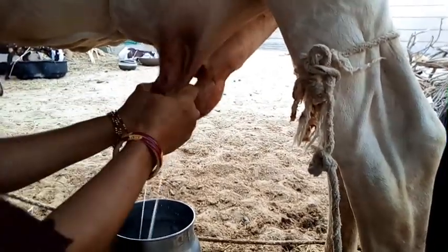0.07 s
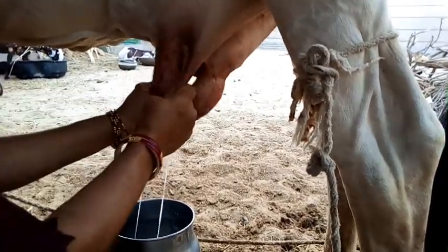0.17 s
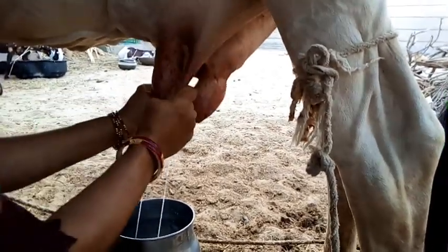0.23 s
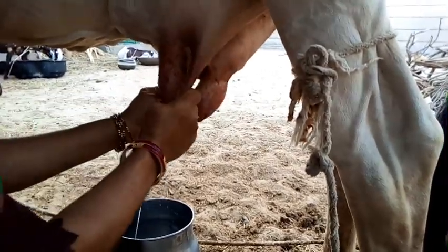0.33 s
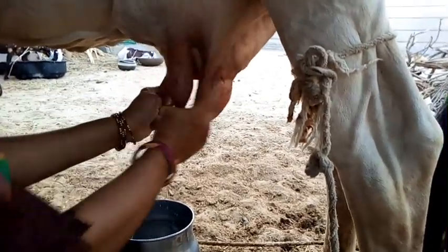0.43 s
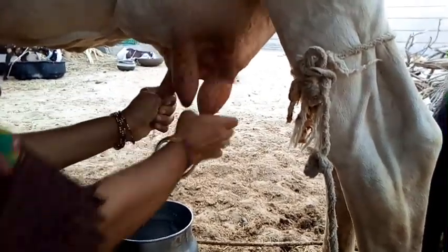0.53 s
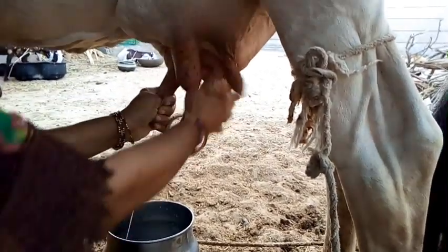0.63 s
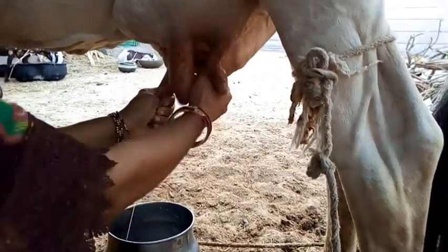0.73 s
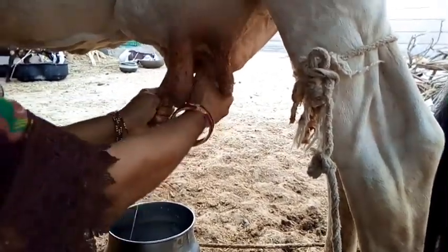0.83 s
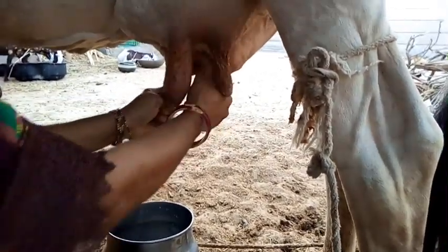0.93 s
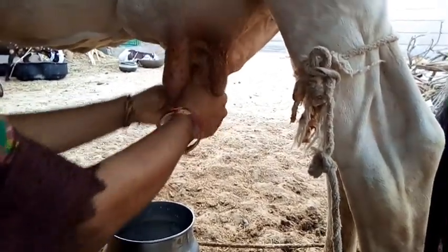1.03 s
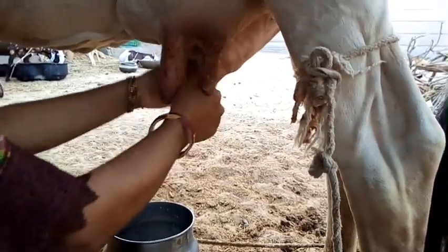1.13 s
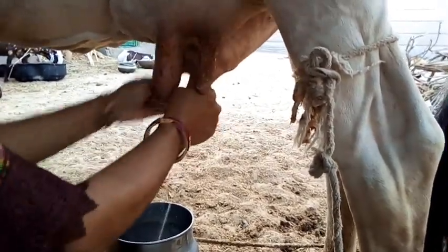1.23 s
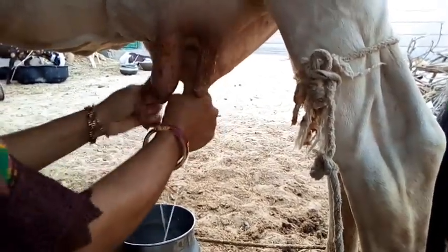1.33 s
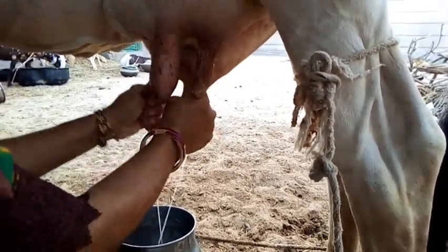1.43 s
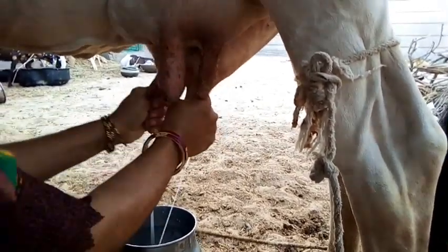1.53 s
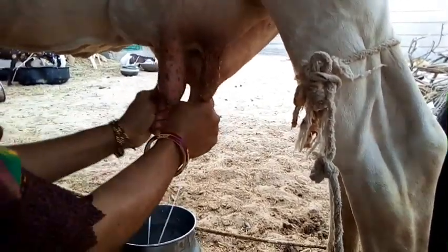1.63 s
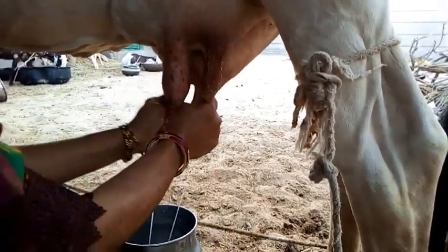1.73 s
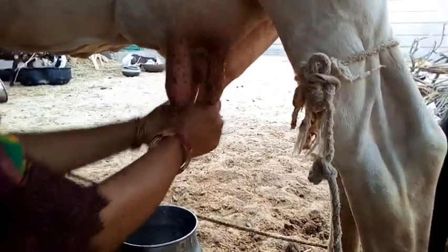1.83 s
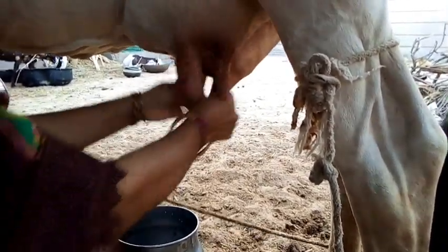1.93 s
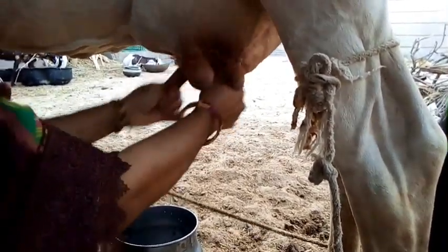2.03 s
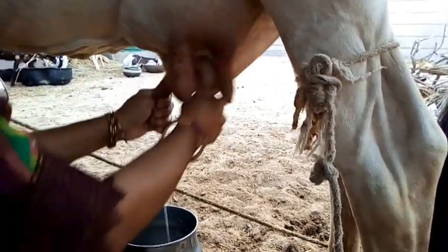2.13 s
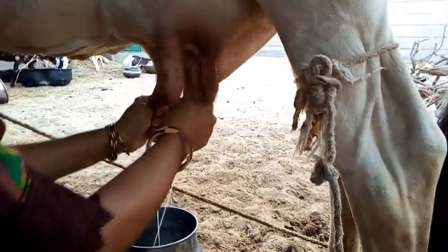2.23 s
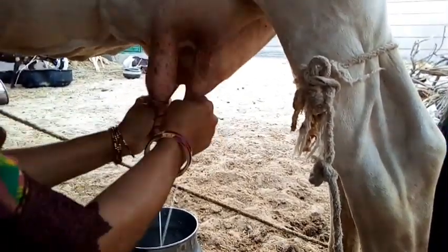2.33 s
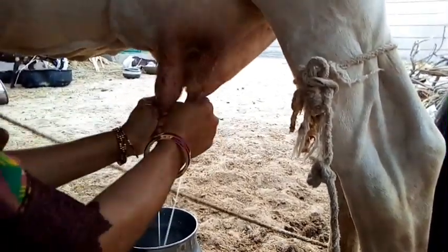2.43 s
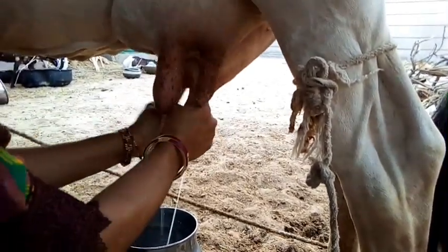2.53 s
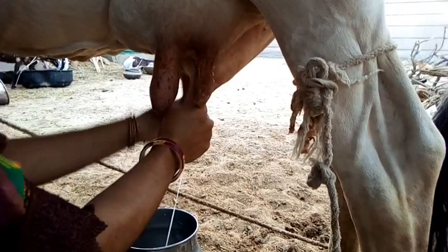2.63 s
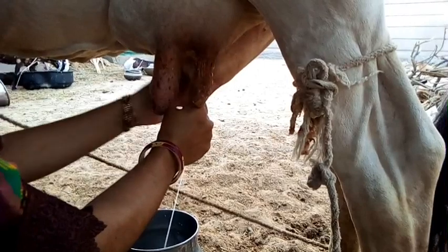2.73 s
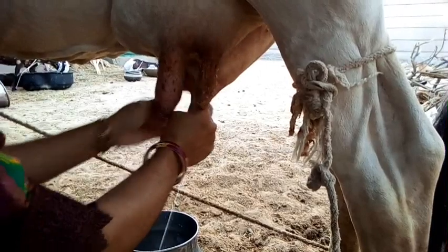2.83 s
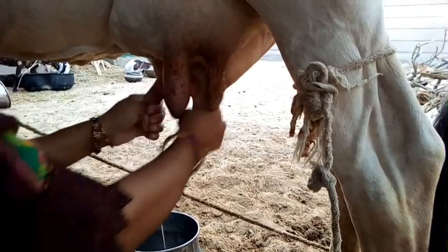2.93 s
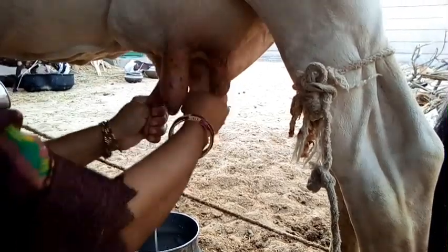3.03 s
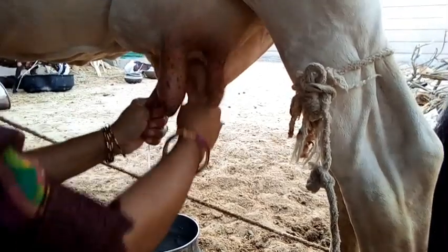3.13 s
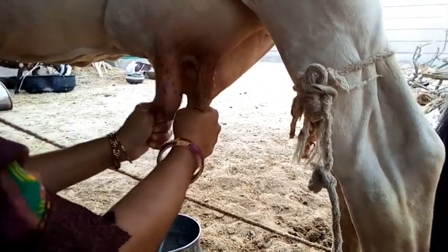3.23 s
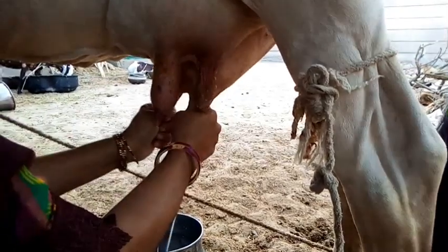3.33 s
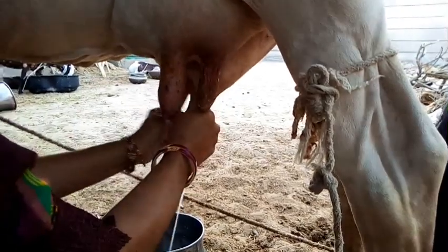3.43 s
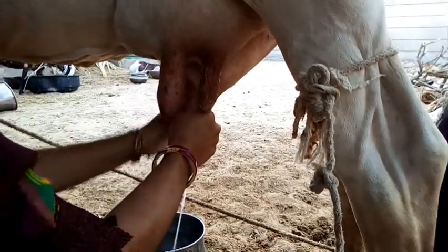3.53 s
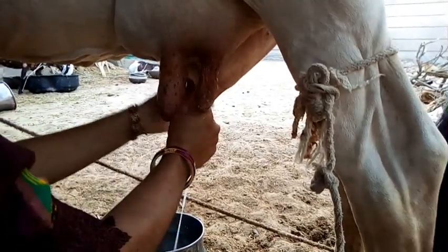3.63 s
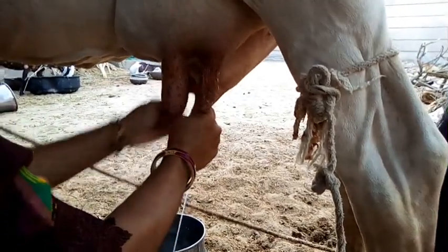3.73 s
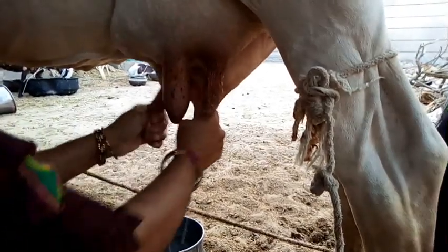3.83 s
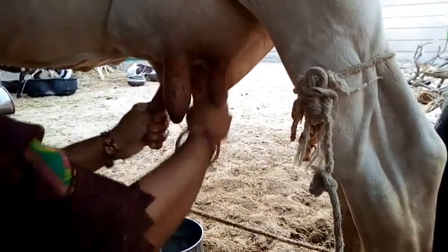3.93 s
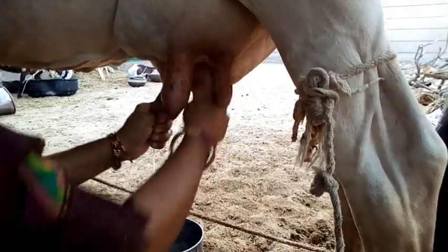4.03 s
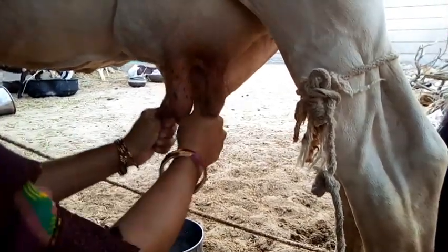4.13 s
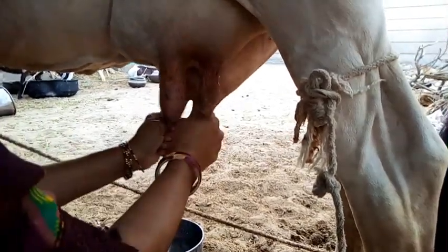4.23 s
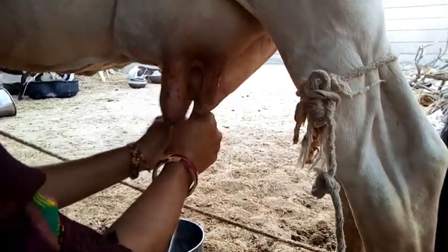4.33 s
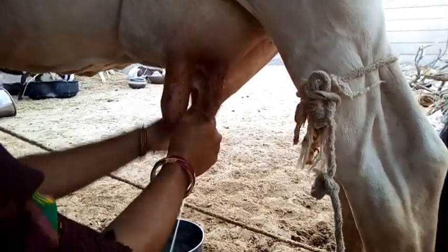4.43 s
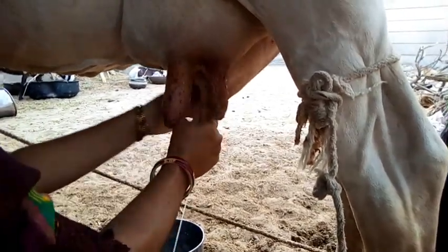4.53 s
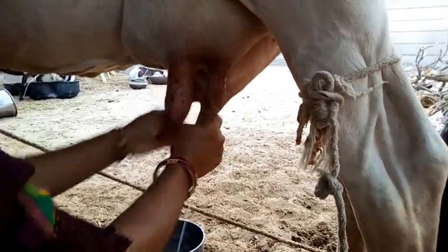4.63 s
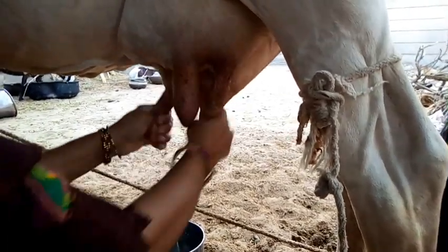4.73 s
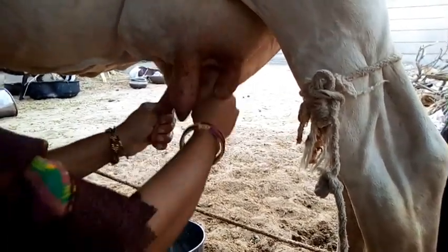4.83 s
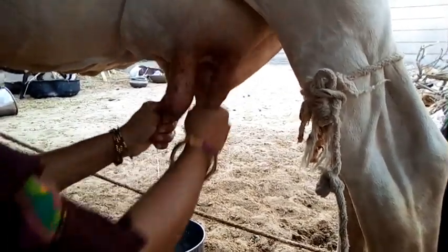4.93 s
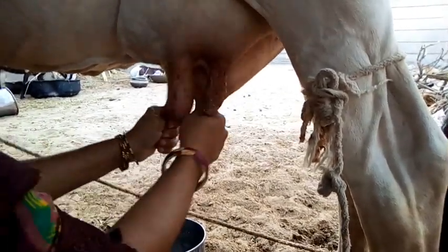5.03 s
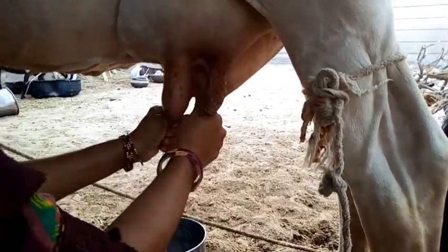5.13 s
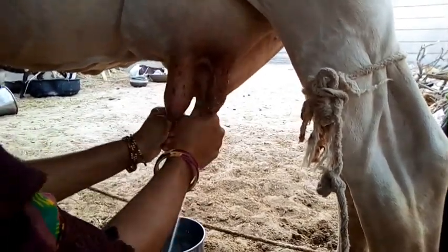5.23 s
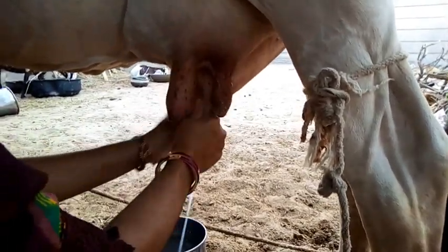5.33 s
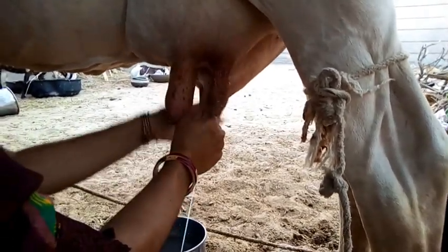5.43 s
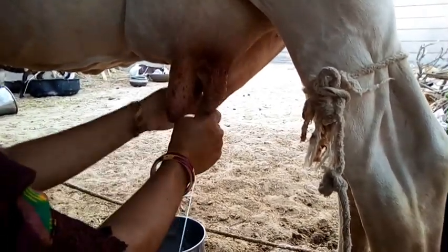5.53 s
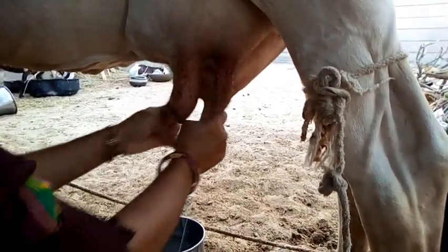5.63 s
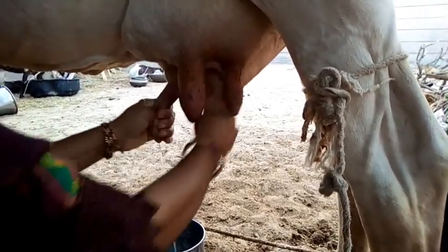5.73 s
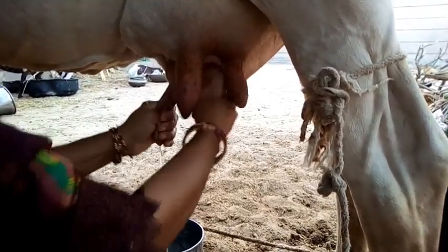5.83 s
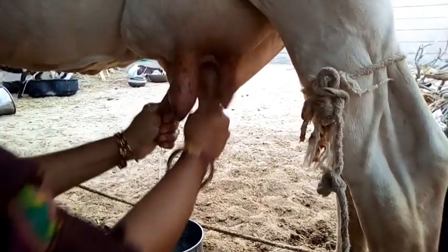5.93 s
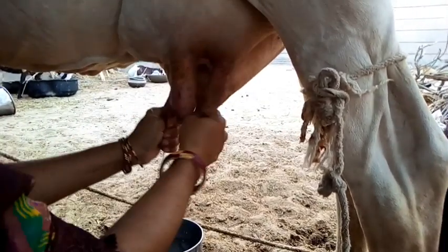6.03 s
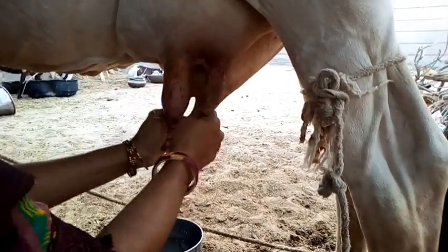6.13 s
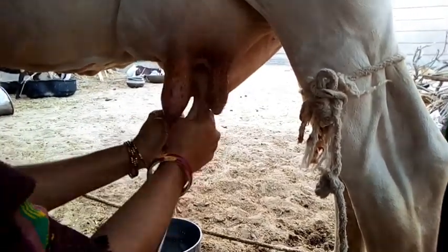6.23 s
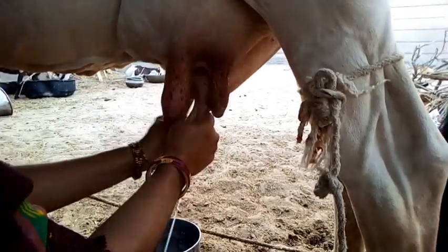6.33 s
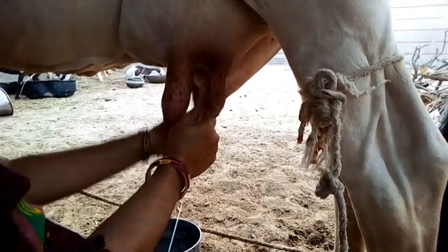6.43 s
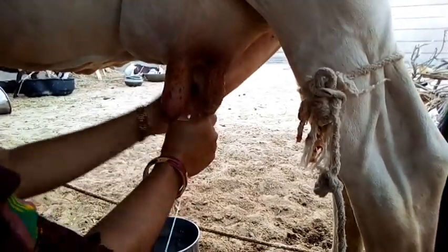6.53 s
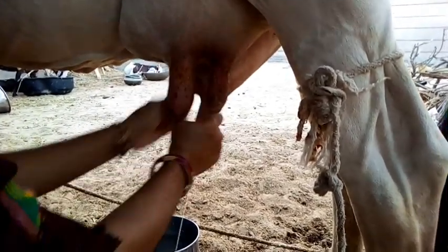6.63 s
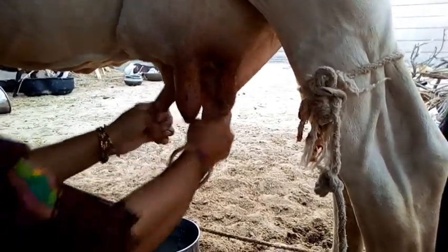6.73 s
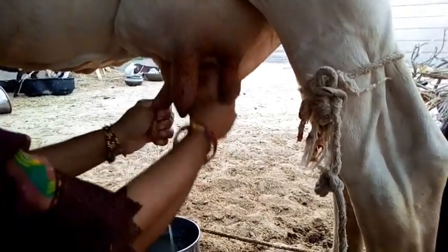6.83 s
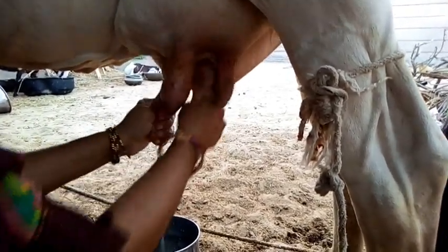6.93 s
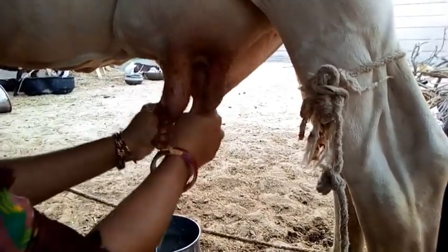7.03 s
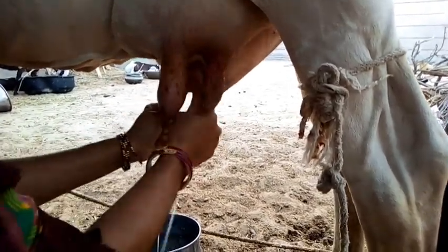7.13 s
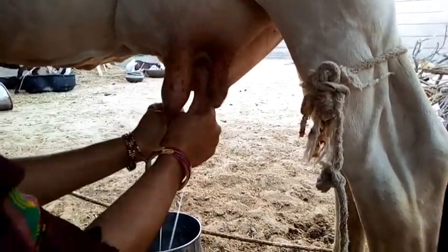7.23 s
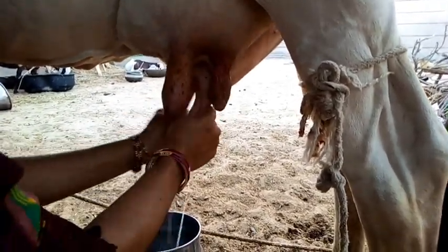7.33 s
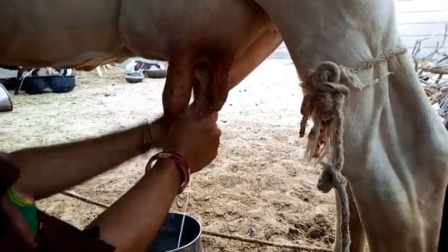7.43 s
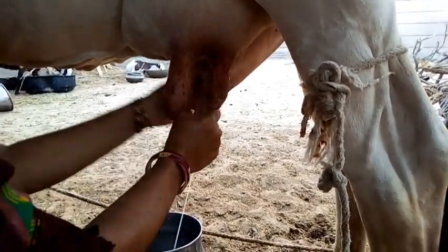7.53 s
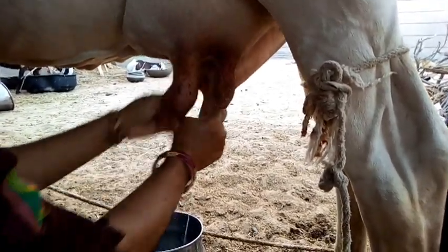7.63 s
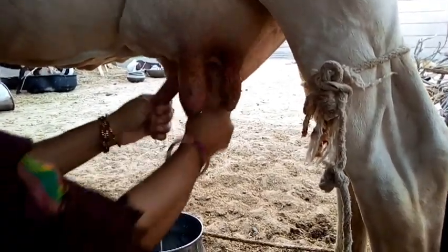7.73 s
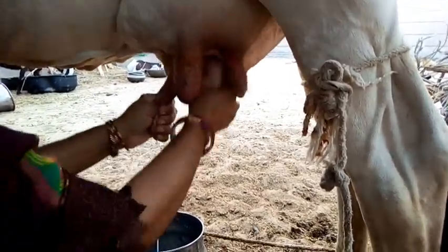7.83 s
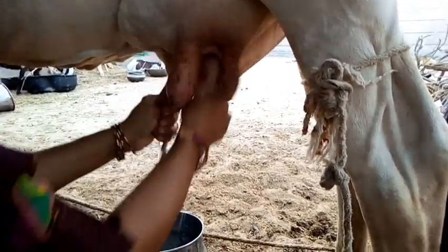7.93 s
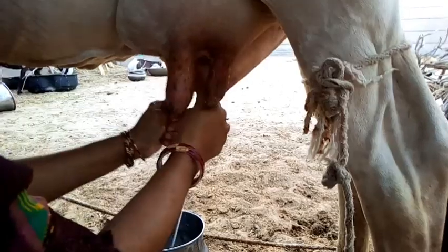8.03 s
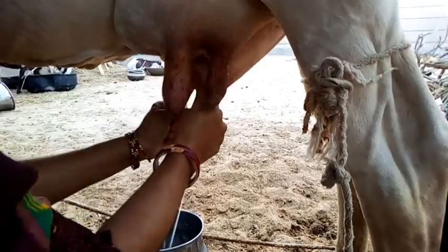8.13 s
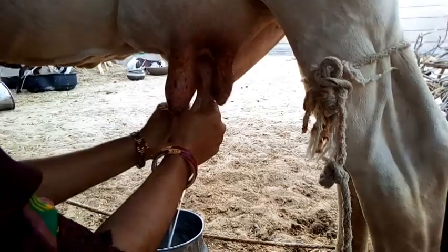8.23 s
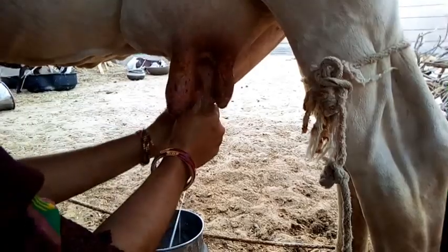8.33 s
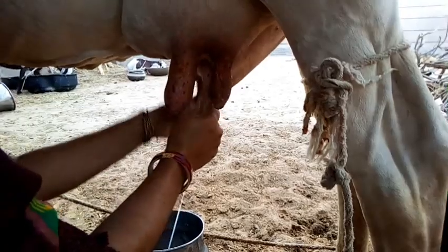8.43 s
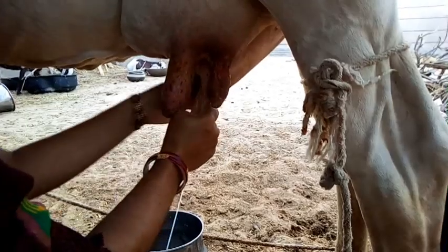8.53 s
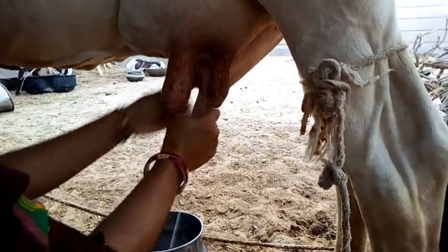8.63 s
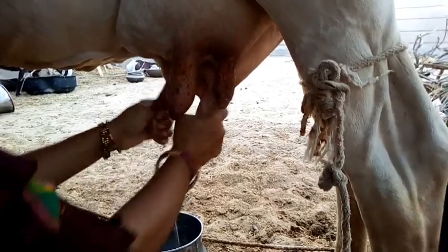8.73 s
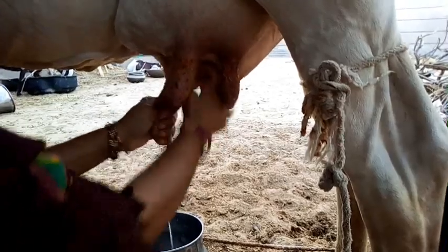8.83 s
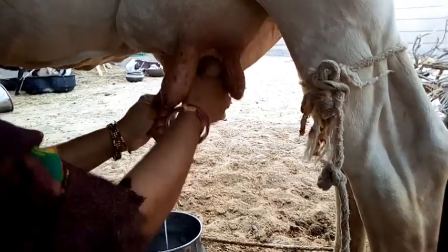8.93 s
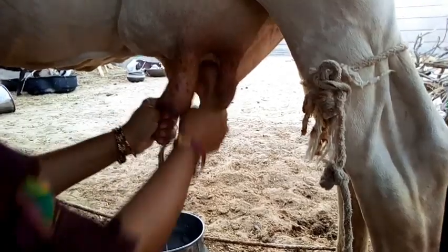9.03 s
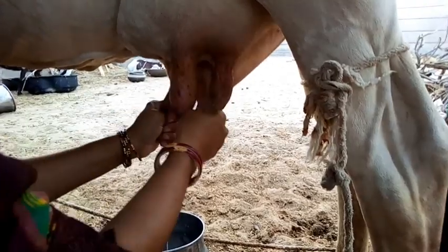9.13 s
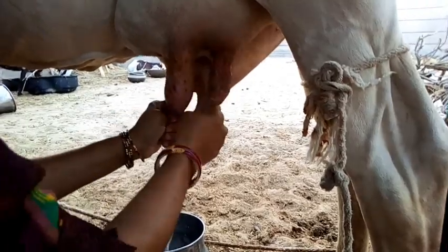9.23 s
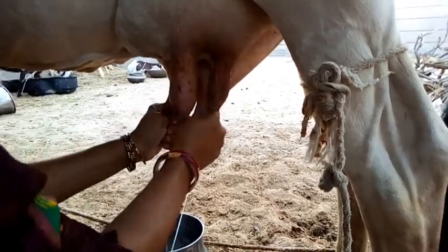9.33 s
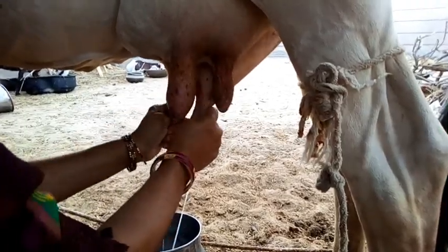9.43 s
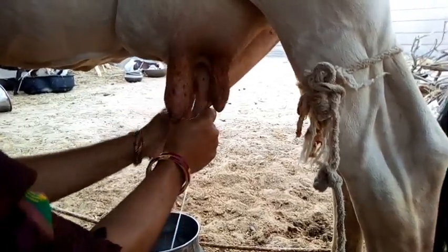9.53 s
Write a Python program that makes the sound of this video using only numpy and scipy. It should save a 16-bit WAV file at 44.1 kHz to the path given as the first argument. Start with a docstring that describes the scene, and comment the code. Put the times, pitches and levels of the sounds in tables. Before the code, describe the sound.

A cow is milked by hand in a quiet open yard, with one microphone near the pail. Streams of milk drum and hiss into the bucket in steady pulses, gurgling deeper as it fills, with sharp little drops smacking the metal. Thin bird whistles appear now and then, then a rapid chirping song around six seconds. Faint air hiss and a weak wavering motor hum remain behind.

```python
"""A cow is milked by hand into a metal pail: each jet is a stream of random drops that excites the hollow of
the pail, patters through the resonances of its wall and fizzes as filtered foam and spray.
Swelling tones gulp, small bubbles ring and fat drops smack as bursts of noise.
Gliding whistles make small birds chirp nearby, over the open yard's filtered hiss and two wavering tones
of a distant motor. One microphone, close by."""
import sys
import numpy as np
from scipy import signal
from scipy.fft import rfft, irfft, next_fast_len
from scipy.io import wavfile

SR = 44100
rng = np.random.default_rng(int(sys.argv[2]) if len(sys.argv) > 2 else 0)


def wrap_up_sound(samples):
    """Save the sound to the file named by the first command line argument, as 16-bit audio."""
    columns = np.atleast_2d(samples).T
    # keep every value between -1 and 1, then stretch to whole-number steps
    tamed = np.clip(columns, -1, 1)
    steps = np.round(tamed * 32767).astype(np.int16)
    wavfile.write(sys.argv[1], SR, steps)


N = 422478
TIME = np.arange(N) / SR
TOP_HZ = 15550  # upper edge of the sound


def undb(db):
    """Decibels to gain."""
    return 10 ** (np.asarray(db) / 20)


def unit(x):
    """Scale to rms 1."""
    return x / np.sqrt(np.mean(x ** 2) + 1e-20)


def gains(table):
    """The dB columns of a curve as gains at every sample."""
    s, *columns = np.transpose(table)
    return [undb(np.interp(TIME, s, column)) for column in columns]


def add(track, s, sound):
    """Mix a sound into a track at time s."""
    i = max(int(s * SR), 0)
    track[i:i + len(sound)] += sound[:max(N - i, 0)]


def walk(rate, size=N):
    """Smooth chance with a spread near 1: random knots, rate per second, joined by lines."""
    position = np.arange(size) * rate / SR
    count = int(position[-1]) + 2
    knots = rng.standard_normal(size)[:count]
    return 1.162 * np.interp(position, np.arange(count), knots)


def colour(x, points):
    """Filter by a spectrum of (Hz, dB) points, joined along log frequency."""
    hz, db = np.transpose(points)
    size = next_fast_len(N + 4096)
    f = np.maximum(np.fft.rfftfreq(size, 1 / SR), 1)
    gain = undb(np.interp(np.log(f), np.log(hz), db))
    return irfft(rfft(x, size) * gain, size)[:N]


def lowpass(x, hz):
    """Keep the lows without shifting them in time."""
    return signal.sosfiltfilt(signal.butter(2, hz, fs=SR, output="sos"), x)


def resonate(x, hz, width):
    """One resonance, gain 1 at its centre."""
    return signal.lfilter(*signal.iirpeak(hz, hz / width, SR), x)


def tail(t60):
    """Dense reflections that die away, with unit energy."""
    t = np.arange(SR // 2) / SR
    h = rng.standard_normal(len(t)) * undb(-60 * t / t60)
    return h / np.linalg.norm(h)


def echoes(x, t60, wet_db):
    """Direct sound plus the reflections of the yard."""
    return x + undb(wet_db) * signal.fftconvolve(x, tail(t60))[:N]


def drops(rate, scatter_db):
    """Random impacts of unequal size, rate per second."""
    hit = rng.random(N) < rate / SR
    sign = rng.choice([-1, 1], N)
    size = undb(scatter_db * np.clip(rng.standard_normal(N), -2, 2))
    return unit(hit * sign * size)


def bubbles(count, low_hz, high_hz, cycles, scatter_db):
    """Bubbles at random moments, each a short ring gliding upward."""
    out = np.zeros(N)
    for when, size, strength in rng.random((count, 3)):
        hz = low_hz * (high_hz / low_hz) ** size
        age = np.arange(int(cycles * SR / hz)) * hz / (cycles * SR)  # 0 to 1
        ring = np.exp(-5 * age) * np.sin(2 * np.pi * cycles * age * (1 + 0.065 * age))
        level = undb(scatter_db * strength ** 3) * (hz / low_hz) ** 0.54
        add(out, when * N / SR, level * ring)
    return unit(out)


# colour of the air in the yard: [f/Hz, relative level/dB]
YARD_COLOUR = [(25, -33), (45, -30), (75, -1), (130, 4.5), (250, -7), (400, 3), (520, -10), (850, -9),
               (1500, -9.5), (2500, -10.5), (4500, -4), (6200, -8.5), (7200, -22), (8200, -30),
               (13500, -31), (15000, -15)]
YARD_DB = -57.8
# distant motor, before a final trim: [t/s, level of the low line/dB, level of the upper line/dB]
MOTOR_LEVELS = [(0, -54, -51), (.6, -72, -59.5), (1.9, -82, -68), (2.5, -68, -56), (4.2, -66, -67.5),
                (5.3, -71, -54), (6.4, -73, -65.5), (7.2, -58, -59), (8, -63, -58), (9, -52.5, -65),
                (9.58, -71, -68)]
# the two lines of the motor: [f/Hz of the low line, f/Hz of the upper line]
MOTOR_HZ = (68.7, 95.2)


def yard():
    """Soft outdoor hiss and the wavering hum of a distant motor."""
    air = unit(colour(rng.standard_normal(N), YARD_COLOUR))
    air = air * undb(YARD_DB + 1.5 * walk(1.44))
    hum = 0
    for hz, gain in zip(MOTOR_HZ, gains(MOTOR_LEVELS)):
        wavering_hz = hz * (1 + 0.037 * walk(18))
        hum = hum + gain * np.sin(2 * np.pi * np.cumsum(wavering_hz) / SR)
    return air + undb(-0.5) * hum


# one row per pull of a teat, the two weak ones a dribble; levels drive the layers before their own trims:
# [t/s of the start, tightening/s, draining/s, plunge level/dB, splash level/dB, spray level/dB,
#  pressure lacking at the start/dB, pressure lacking at the end/dB, level of the wall/dB,
#  tilt of the boom/dB per octave, brightness of the foam/dB]
SQUIRTS = [(.03, 0.055, 0.13, -35, -39.5, -49, 1.5, 8, -9.5, 2, -12),
           (.27, 0.096, .2, -46.5, -61, -74, 3, -3.5, -13, -8, -0.5),
           (.696, .02, 0.058, -52, -67.5, -82, 0, -3.5, 3, 10, 8),
           (1.172, 0.37, .13, -37, -45, -56.5, 3, 2.5, -6, 9, -9),
           (2.122, 0.33, 0.34, -37.5, -41, -49.5, 7.5, 8.5, -3.5, -1.5, -3.5),
           (2.916, 0.55, 0.28, -37, -42, -48, 7.5, 11, 0.5, 6, -6),
           (3.858, 0.49, .22, -35.5, -45.5, -49, 4.5, 9, 1.5, 4.5, 1),
           (4.711, .53, 0.36, -34, -40.5, -45, 12, 20, -2, 4.5, -0.5),
           (5.764, 0.42, 0.36, -36.5, -44.5, -51.5, 3.5, 13, 2.5, 5, 2.5),
           (6.789, 0.43, 0.31, -35.5, -43, -50, 6.5, 15, 1, -6.5, -2.5),
           (7.727, 0.33, 0.56, -37.5, -43.5, -45.5, 12.5, 16.5, 1, -11.5, -2.5),
           (8.71, .7, 0.15, -37.5, -46.5, -50.5, 10, 5.5, 0, -1.5, -4.5)]


def squeezes(peaks_db, law):
    """Each jet sets in fast, changes pressure as the fist tightens and the teat drains, then is cut off."""
    follow, onset_db_s, release_db_s = law
    power = 0
    for (start, tighten, drain, _, _, _, start_db, end_db, *_), peak_db in zip(SQUIRTS, peaks_db):
        end = start + tighten + drain
        slack_db = np.interp(TIME, [start, start + tighten, end], [start_db, 0, end_db])
        before_db = onset_db_s * np.maximum(start - TIME, 0)
        after_db = release_db_s * np.maximum(TIME - end, 0)
        level_db = peak_db - follow * slack_db - before_db - after_db
        power = power + undb(np.maximum(level_db, -120)) ** 2
    return np.sqrt(power)


# how each layer follows the squeeze: (dB per dB of pressure, onset dB per s, release dB per s)
PLUNGE_LAW, SPLASH_LAW, SPRAY_LAW = (0.39, 210, 190), (0.95, 104, 130), (1.33, 87, 95)
FLUTTER_HZ, FLUTTER_DB = 21.83, 1.26  # the jet is never quite even


def jet():
    """Strength of plunge, splash and spray, and the colour given by where each squirt lands."""
    start, tighten, _, plunge_db, splash_db, spray_db, _, _, *aim = np.transpose(SQUIRTS)
    flutter = undb(FLUTTER_DB * walk(FLUTTER_HZ))
    layers = [(plunge_db, PLUNGE_LAW), (splash_db, SPLASH_LAW), (spray_db, SPRAY_LAW)]
    strengths = [flutter * squeezes(db, law) for db, law in layers]
    return strengths + gains(np.transpose([start + tighten, *aim]))


# resonances of the hollow of the pail: [f/Hz, width/Hz, relative level/dB]
HOLLOW = [(189, 25, 0), (215.4, 14.7, 6.5), (250.3, 25, 4.5), (281, 20, -5), (326.5, 11.8, 2.5),
          (353, 4.1, -14), (399.4, 19.5, -8.5)]


def plunge(force, tilt):
    """Drops punch into the milk; the air in the pail booms with them."""
    push = drops(rate=330, scatter_db=1.5) * force
    boom = 0
    for hz, width, db in HOLLOW:
        gain = undb(db) * tilt ** np.log2(hz / 250)
        boom = boom + gain * resonate(push, hz, width)
    boom = colour(boom, [(20, 10), (45, -5), (100, -2.5), (170, 1.5), (410, 1.0), (520, -9.0), (1200, -14.0)])
    return unit(boom) * np.sqrt(np.mean(force ** 2)) * undb(-2.0)


def gurgle(force):
    """Pea-sized bubbles ring in the churned milk as long as the jet plunges."""
    return undb(-18.5) * force * bubbles(count=450, low_hz=453, high_hz=927, cycles=58, scatter_db=2.5)


# resonances of the wall of the pail: [f/Hz, width/Hz, relative level/dB, change as the milk rises/dB per s]
WALL = [(698, 73, 1.5, -0.27), (1056, 83, -1, 0.08), (1261, 41, -2.5, 0.51), (1313, 61, -3.5, 0.6),
        (1730, 150, -1, -0.16), (2355, 130, 3, -0.83), (3040, 240, -10, 0.12), (3760, 130, -5.5, -0.4),
        (4806, 177, 1.5, 0), (5500, 280, -32, -4), (6630, 150, -9, 0.5), (8530, 110, -10, 0),
        (9350, 130, -16, 0)]
# colour of the foam: [f/Hz, relative level/dB]
FOAM_COLOUR = [(200, -5.5), (450, -10.5), (700, -3.5), (1100, -5), (1500, -3.5), (2300, -1.5), (2800, -2),
               (3800, -0.5), (4400, -5.5), (5600, 0.5), (6500, 1.5), (7300, -38), (9000, -41), (15000, -44)]
# colour of the spray: [f/Hz, relative level/dB]
SPRAY_COLOUR = [(1500, -16), (4000, 5), (5500, 2), (7200, -1), (8000, -6.5), (8700, -5), (9300, -6),
                (11500, -5.5), (13000, -9.5), (14000, -21), (14700, 6.5), (15500, 1)]
WANDER_HZ, WANDER_DB = 5, 2.5  # the landing point wanders and wakes other modes of the wall


def splash(splash_gain, spray_gain, wall_gain, bright):
    """The wobbling jet patters on foam and wall and throws off a fine spray."""
    wobble = undb(1.37 * walk(70))
    knocks = drops(rate=2400, scatter_db=6.5) * wobble
    wall = 0
    for hz, width, db, drift in WALL:
        mode_gain = undb(db + drift * TIME + WANDER_DB * walk(WANDER_HZ))
        wall = wall + mode_gain * resonate(knocks, hz, width)
    wall = unit(wall)
    fizz = bubbles(count=4000, low_hz=792, high_hz=6020, cycles=20.6, scatter_db=6)
    foam = drops(rate=1600, scatter_db=3.5) * wobble + undb(-10.0) * fizz
    foam = unit(colour(foam, FOAM_COLOUR))
    dull = lowpass(foam, 3000)
    foam = dull + bright * (foam - dull)  # thick foam swallows the treble
    spray = unit(colour(drops(rate=1400, scatter_db=3.0) * wobble, SPRAY_COLOUR))
    return splash_gain * (undb(1.5) * foam + wall_gain * wall) + spray_gain * undb(6) * spray


# the jet spits for a moment, throwing off extra spray: [t/s, length/s, level/dB before the trim of the spray]
SPITS = [(.06, .04, -55), (0.188, 0.054, -50), (1.09, 0.04, -53), (1.471, 0.07, -48), (1.595, 0.047, -49.5),
         (2.018, 0.039, -67), (2.105, 0.036, -59), (3.085, 0.03, -51), (3.87, 0.043, -52),
         (4.888, .04, -48), (5.204, .055, -44), (6.53, 0.05, -56), (7.543, 0.02, -51.5)]


def spits():
    """Short swells in the strength of the spray, each a rounded arch."""
    strength = 0
    for s, length, db in SPITS:
        across = 2 * (TIME - s) / length - 1  # -1 to 1 within the spit
        strength = strength + undb(db) * np.sqrt(np.maximum(1 - across ** 2, 0))
    return strength


# the fattest drops that smack the pail: [t/s, level/dB before a final trim, centre f/Hz]
SMACKS = [(0.085, -22.5, 1510), (0.423, -35.5, 3900), (0.695, -45, 700), (1.51, -32, 1990),
          (1.606, -28, 2240), (2.236, -29, 2000), (2.456, -20.5, 2820), (2.473, -21, 1910),
          (3.31, -22, 2190), (3.393, -25, 1340), (4.415, -27, 4870), (4.894, -27, 4860), (5.142, -25, 1820),
          (5.234, -23, 2000), (5.314, -22, 2600), (7.215, -20.5, 1900), (7.633, -31.5, 4820),
          (7.728, -28.5, 2260), (7.742, -32, 8500), (8.008, -24, 1900), (8.107, -33, 4810),
          (8.757, -31, 1380), (9.096, -27, 900)]


def smacks():
    """A fat drop bursts on the wall in a brief crackle of band-limited noise."""
    out, t = np.zeros(N), np.arange(SR // 20) / SR
    for s, db, hz in SMACKS:
        burst = rng.standard_normal(len(t)) * np.exp(-t / 0.0054)
        band = [hz / 2.1, min(hz * 1.5, TOP_HZ)]
        burst = signal.sosfilt(signal.butter(2, band, "bandpass", fs=SR, output="sos"), burst)
        loudness = np.std(burst[:SR // 250])  # over the first 4 ms
        add(out, s, undb(db - 13.0) * burst / loudness)
    return out


def pail(x, t60, wet_db, count=12):
    """Short waves bounce around inside the pail, by other paths as the landing point wanders."""
    low = lowpass(x, 2200)
    high = x - low
    paths = np.array([signal.oaconvolve(high, tail(t60)[:SR // 10])[:N] for _ in range(count)])
    share = np.array([walk(7) for _ in range(count)])
    wet = np.sum(paths * share, axis=0) / np.linalg.norm(share, axis=0)
    return low + (high + undb(wet_db) * wet) / np.hypot(1, undb(wet_db))


# the biggest gulps of air dragged under by the jet: [t/s, level/dB before a final trim, starting f/Hz]
BIG_GULPS = [(1.142, -32.5, 336), (1.266, -25.5, 323), (1.498, -32, 277), (1.665, -23.5, 251),
             (2.23, -27, 402), (2.31, -19.5, 272), (2.941, -24.5, 328), (3.058, -30, 308),
             (3.391, -26, 246), (3.442, -23, 241), (3.663, -21, 247), (3.957, -20, 255), (4.146, -21, 216),
             (4.32, -23, 248), (4.429, -32, 212), (4.742, -23.5, 340), (4.881, -18.5, 230),
             (4.959, -20, 206), (5.479, -24.5, 218), (6.269, -19.5, 200), (7.098, -24, 329),
             (7.229, -16.5, 182), (7.76, -22, 256), (8.012, -24, 333), (8.047, -20, 210),
             (8.374, -22.5, 192), (8.943, -20, 206), (9.154, -23.5, 320)]
# small gulps come by chance, as loud as the plunge allows, and deepen as the pail fills
GULPS_PER_S, GULP_HZ, GULP_SPREAD_OCTAVES, GULP_OVER_PLUNGE_DB = 7, 279.6, .18, 6.5
GULP_SINK_OCTAVES_PER_S = 0.059


def gulps(force):
    """A pocket of air swells, rings for a few cycles and rises in pitch: a few big ones, many small."""
    out, t = np.zeros(N), np.arange(SR // 10) / SR
    age = t / 0.0083
    swell = age * np.exp(1 - age)
    big = [(s, undb(db), hz) for s, db, hz in BIG_GULPS]
    moments = np.flatnonzero(rng.random(N) < GULPS_PER_S / SR)
    octaves = GULP_SPREAD_OCTAVES * rng.standard_normal(N) - GULP_SINK_OCTAVES_PER_S * TIME
    pitch = GULP_HZ * 2 ** octaves
    small = [(i / SR, force[i] * undb(GULP_OVER_PLUNGE_DB), pitch[i]) for i in moments]
    for s, size, hz in big + small:
        ring = np.sin(2 * np.pi * hz * t * (1 + 0.66 * t))
        add(out, s - .003, size * undb(-8.5) * swell * ring)  # sets in 3 ms ahead
    return out


SONG_SCATTER_DB, SONG_SCATTER_OCTAVES = 0.7, 0.0091  # no two notes are sung alike


def phrase(motif, start, period, count):
    """The notes of a motif sung several times at an even pace, each a little different."""
    notes = []
    for k in range(count):
        for s, length, start_hz, end_hz, db, rasp in motif:
            pitch, effort = rng.standard_normal(2)
            shift = 2 ** (SONG_SCATTER_OCTAVES * pitch)
            level_db = db + SONG_SCATTER_DB * effort
            notes.append((start + k * period + s, length, start_hz * shift, end_hz * shift, level_db, rasp))
    return notes


# lone bird calls: [t/s, length/s, start f/Hz, end f/Hz, level/dB before rasp and echo, rasp 0-1]
CHIRPS = [(.83, .03, 2700, 2870, -58, 0.16), (.87, .025, 3000, 2780, -55, 0.3),
          (0.948, 0.036, 2320, 2340, -57, 0.06), (1.004, 0.02, 2310, 2330, -54, 0.05),
          (0.973, .024, 3360, 3060, -48.5, 0.13), (1.026, .06, 5360, 4870, -49.5, .15),
          (1.078, .12, 5050, 5870, -45.5, 0.19), (1.994, 0.02, 5930, 5450, -50.5, 0.3),
          (2.177, 0.12, 5110, 5940, -46, 0.37), (2.712, 0.14, 4060, 2970, -49.5, 0.25),
          (5.511, 0.046, 6240, 5310, -39.5, 0.9), (5.565, 0.066, 5880, 5800, -46.5, .63),
          (6.743, .053, 6700, 8100, -54, .9), (7.046, 0.017, 4940, 6200, -34, 0.4),
          (7.054, 0.019, 6400, 5850, -26, 0.48), (7.295, 0.18, 4900, 5890, -50, .1),
          (8.472, .062, 5060, 4210, -40.5, 0.02)]
# a song of two phrases, each a repeated motif; columns as for the calls, with t/s counted into the motif
OPENING_MOTIF = [(0, .072, 6680, 6580, -44, 0.73), (.083, .055, 4500, 4350, -47.5, 0.54)]
# the second phrase: [t/s into the motif, length/s, start f/Hz, end f/Hz, level/dB, rasp 0-1]
TRILL_MOTIF = [(0, 0.0827, 4115, 4443, -38, 0.23), (.07, .04, 7300, 8100, -52, .65),
               (.104, 0.0547, 5740, 5390, -39.5, 0.31)]
OPENING_S, OPENING_PERIOD_S = 5.352, .138
TRILL_S, TRILL_PERIOD_S = 5.83, .169
ARCH_HZ = 109.3  # each note bows upward in its middle


def birds():
    """Gliding whistles, some made raspy by a fast flutter of pitch and strength; the yard echoes them."""
    out, size = np.zeros(N), SR // 4
    opening = phrase(OPENING_MOTIF, OPENING_S, OPENING_PERIOD_S, count=4)
    trill = phrase(TRILL_MOTIF, TRILL_S, TRILL_PERIOD_S, count=5)
    for s, length, start_hz, end_hz, db, rasp in CHIRPS + opening + trill:
        age = np.minimum(np.arange(size) / (length * SR), 1)
        arch = np.sin(np.pi * age)
        glide_hz = start_hz + (end_hz - start_hz) * age + ARCH_HZ * arch
        hz = glide_hz + rasp * 520 * walk(1100, size=size)
        swell = np.abs(arch) ** .5 * undb(rasp * 5.9 * walk(352, size=size))
        add(out, s, undb(db) * swell * np.sin(2 * np.pi * np.cumsum(hz) / SR))
    return echoes(out, t60=0.35, wet_db=-1.5)


def scene():
    """Milk in the pail, birds and yard, the same in both channels."""
    plunge_gain, splash_gain, spray_gain, wall_gain, tilt, bright = jet()
    all_spray = np.hypot(spray_gain, spits())
    patter = splash(splash_gain, all_spray, wall_gain, bright) + smacks()
    milk = plunge(plunge_gain, tilt) + gurgle(plunge_gain) + gulps(plunge_gain)
    mono = milk + pail(patter, t60=0.029, wet_db=3.0) + birds() + yard()
    return np.array([mono, mono])


def record(dry):
    """The recorder cuts the top steeply."""
    return signal.sosfilt(signal.ellip(12, .2, 80, TOP_HZ, fs=SR, output="sos"), dry)


dry = scene()
out = record(dry)
wrap_up_sound(out)
```